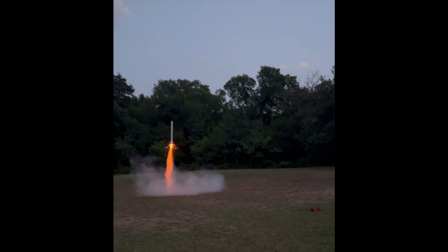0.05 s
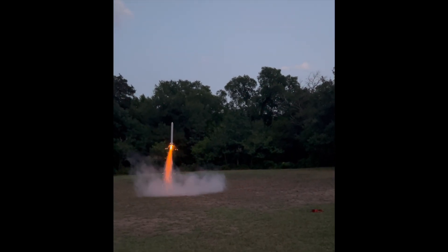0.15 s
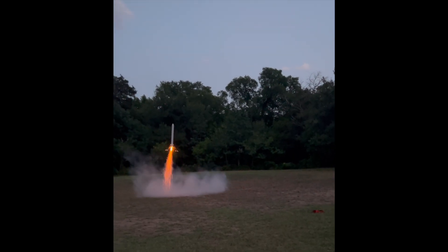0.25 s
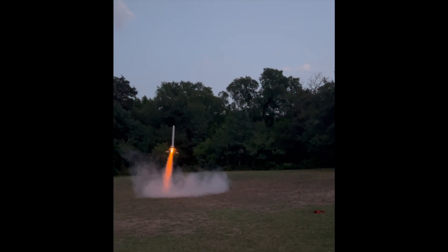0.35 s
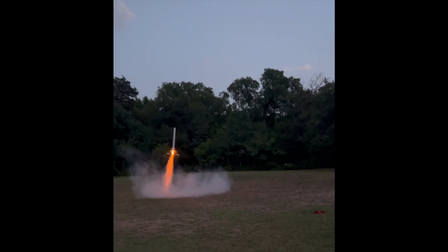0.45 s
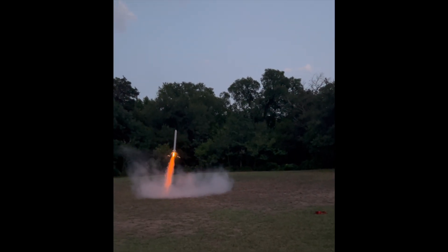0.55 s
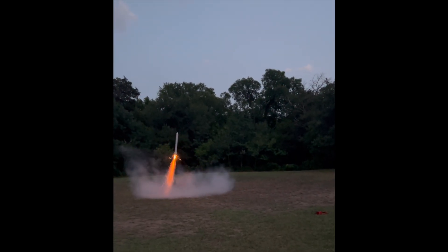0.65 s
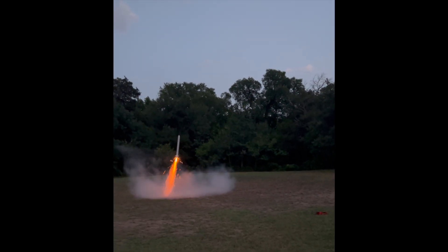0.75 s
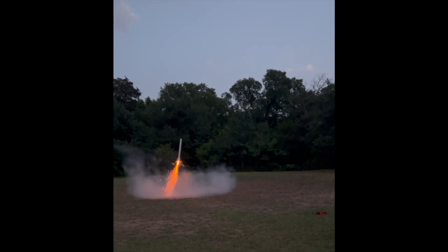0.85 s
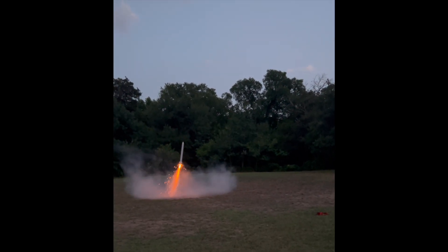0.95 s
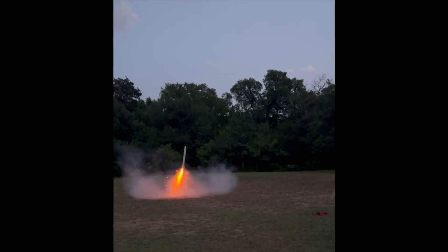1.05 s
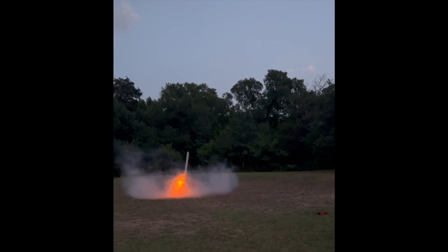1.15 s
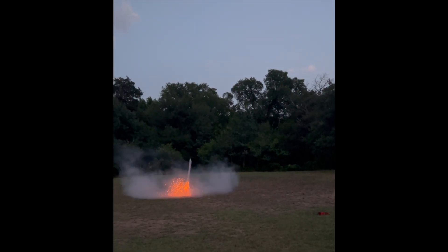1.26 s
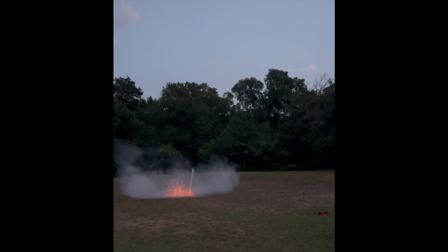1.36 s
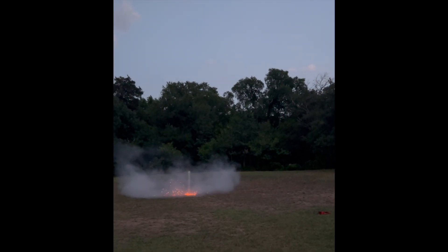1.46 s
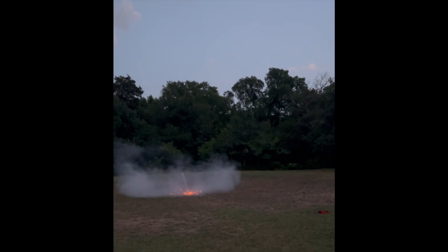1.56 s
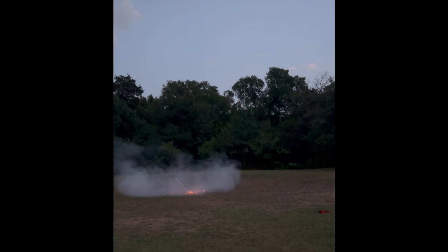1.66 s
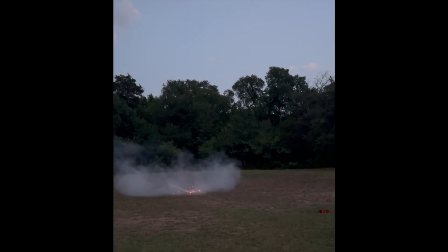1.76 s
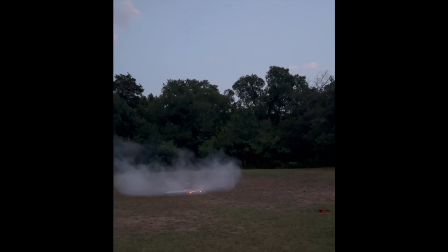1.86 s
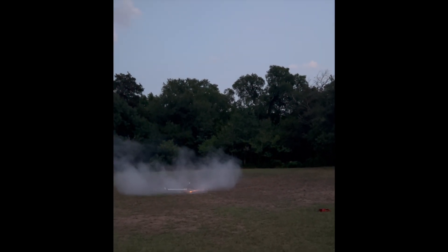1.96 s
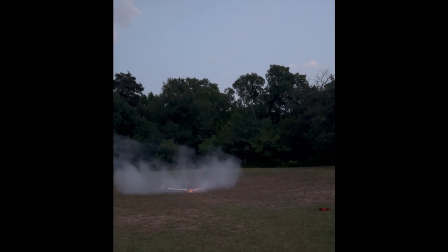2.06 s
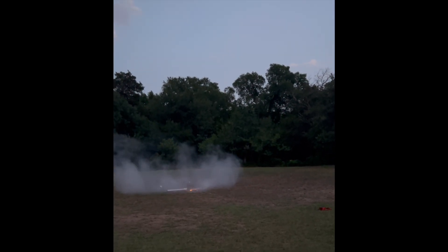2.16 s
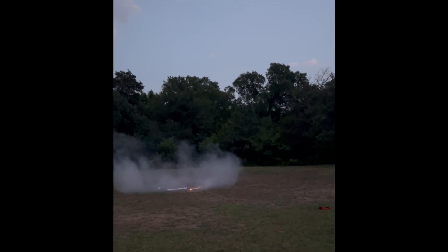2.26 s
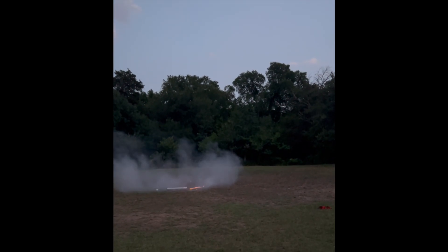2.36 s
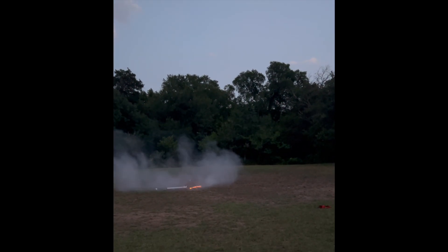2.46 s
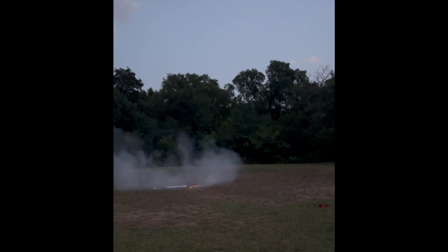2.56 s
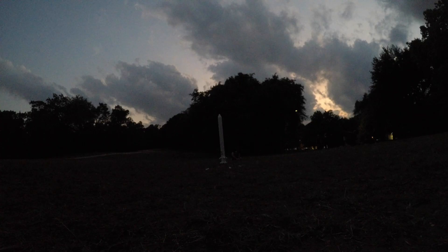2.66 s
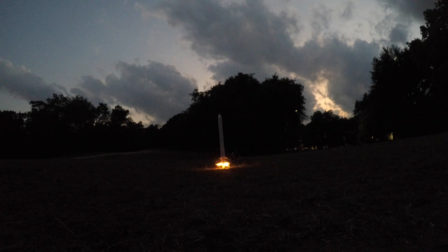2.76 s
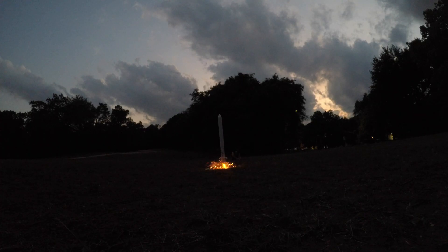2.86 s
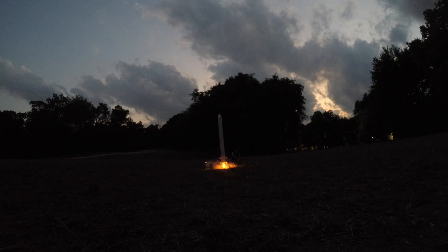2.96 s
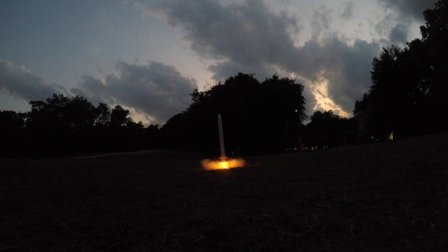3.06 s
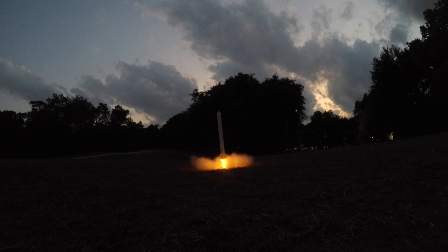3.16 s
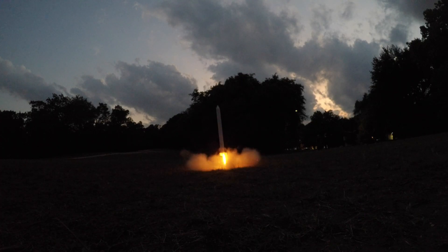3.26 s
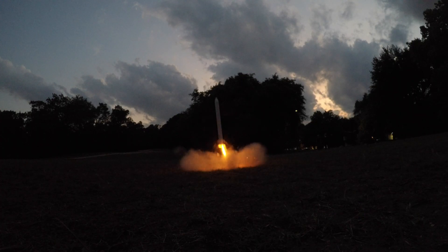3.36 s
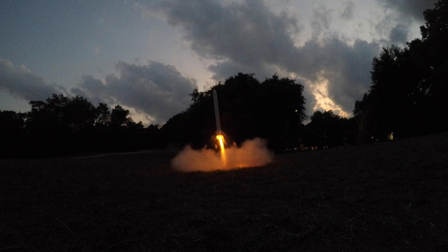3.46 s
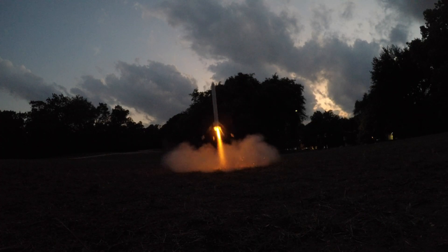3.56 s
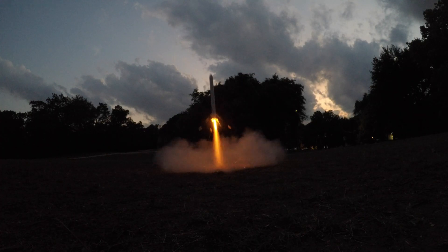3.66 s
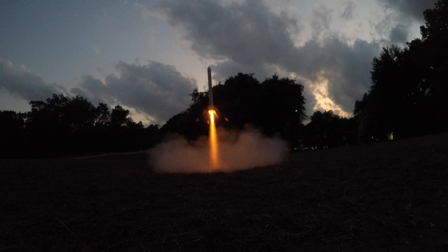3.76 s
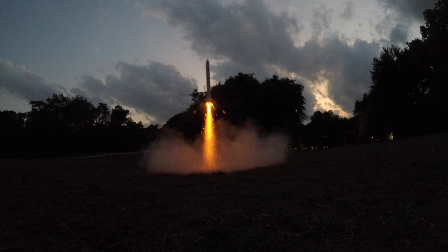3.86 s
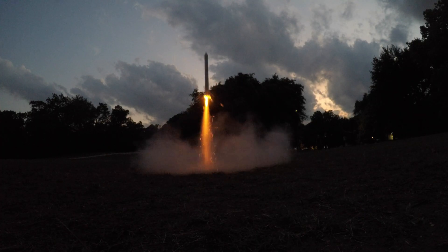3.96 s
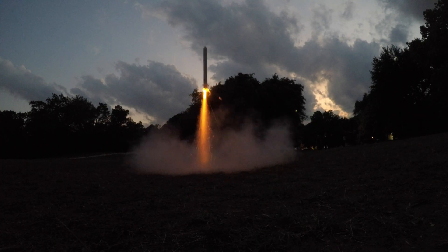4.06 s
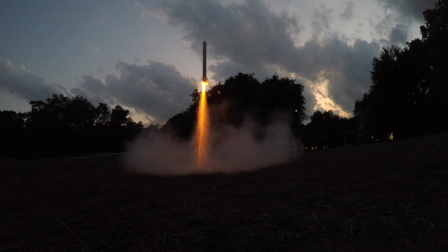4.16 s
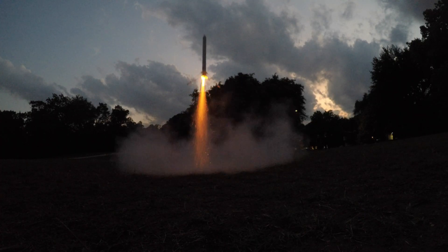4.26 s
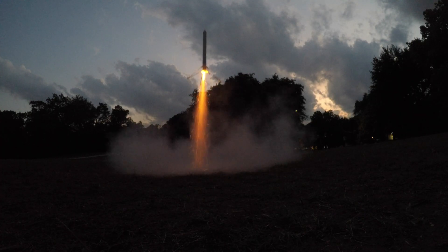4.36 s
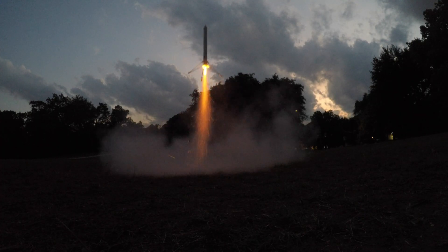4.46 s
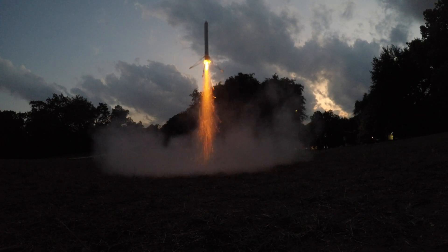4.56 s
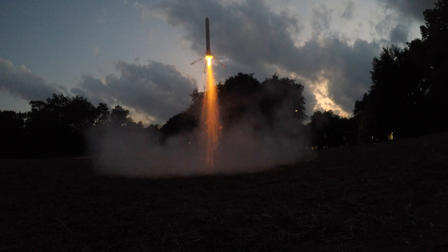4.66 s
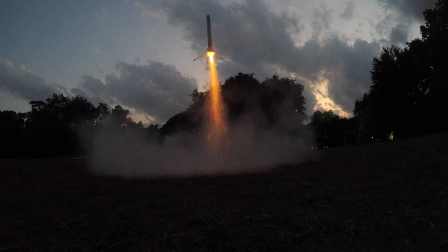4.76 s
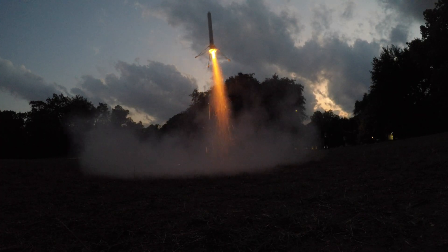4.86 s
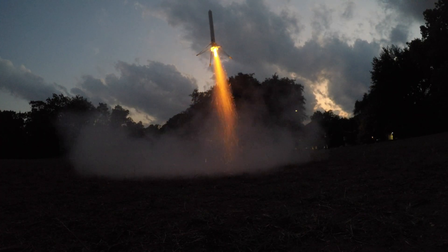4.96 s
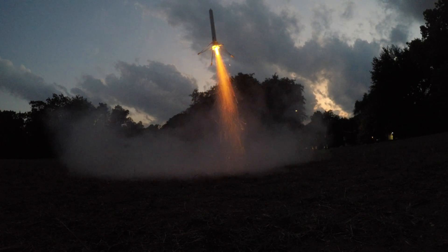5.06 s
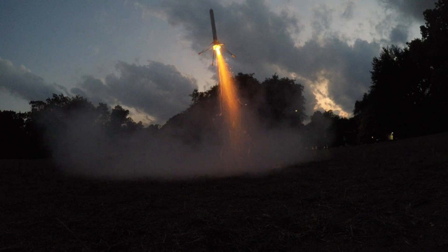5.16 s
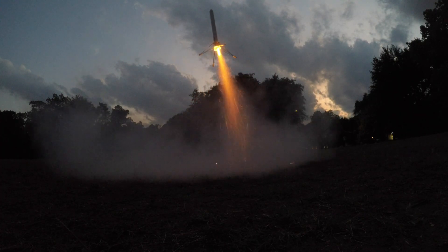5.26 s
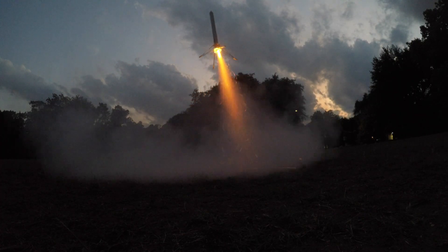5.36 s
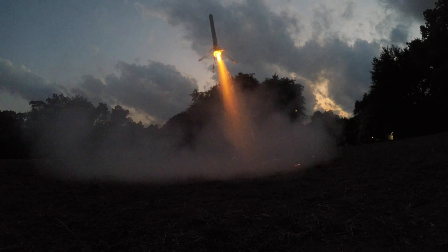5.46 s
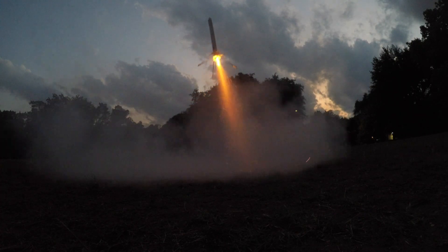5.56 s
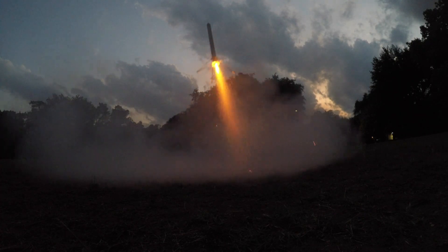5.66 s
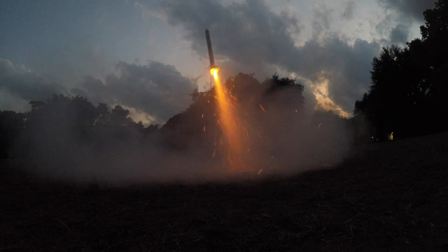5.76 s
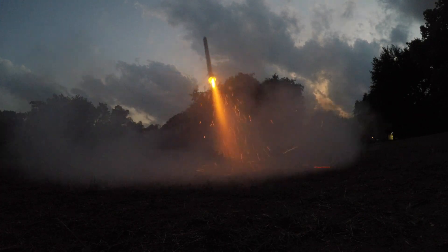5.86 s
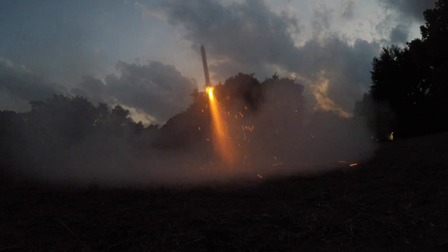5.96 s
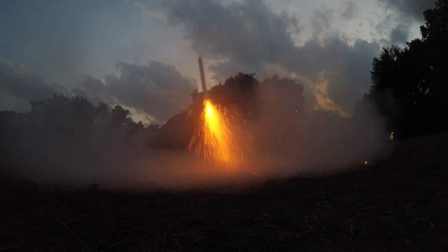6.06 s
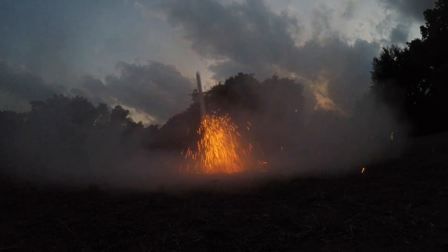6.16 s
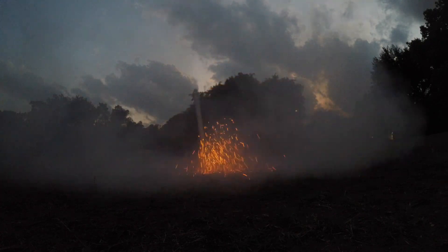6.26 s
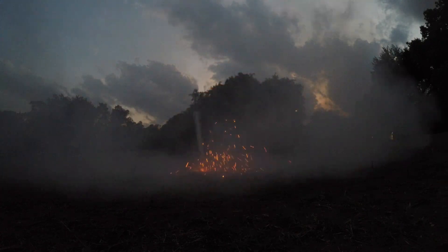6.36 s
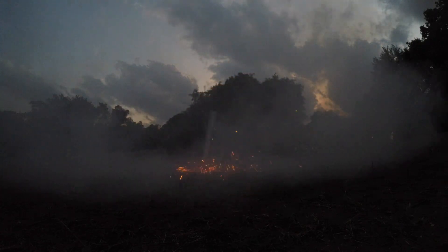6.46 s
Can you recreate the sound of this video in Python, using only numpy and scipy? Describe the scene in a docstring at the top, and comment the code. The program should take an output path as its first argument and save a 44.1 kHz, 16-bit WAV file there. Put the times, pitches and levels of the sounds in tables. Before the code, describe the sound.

A model rocket motor is already burning across an open field, an even rushing hiss with scattered pops and a slight sweep in tone. It dies at about 1.1 seconds. Light knocks at 1.3 mark the landing, followed by dry clicks, a grass scuff and low thuds. Faint smouldering, thin insect hiss and wind on the microphone fill the lull.

At 2.7 seconds the sound jumps close: a second motor ignites with a sharp crack and low boom, swelling by 3 seconds into a much louder, deeper roar. The hiss flares around 3.4 as it lifts off. Irregular sharp pops pepper the jet, which grows brighter and less deep, its tone sweeping slowly as the rocket climbs and sinks. Near 6 seconds the rush collapses into short, rough hoots and chuffs, with one more crack at 6.3 and a low rumble until about 6.5.

```python
"""Two rocket hops over a grass field.

The first is heard from far off, then a cut takes us close to the second; each has its own two-port
microphone. A jet is roar, rush and hiss with pressure pops. It arrives twice, straight and off the
grass, so notches slide as the rocket climbs and sinks. Between the burns: a landing, wind on the
ports, insects and evening air."""
import sys
import numpy as np
from scipy import signal
from scipy.fft import rfft, irfft, next_fast_len
from scipy.io import wavfile
from scipy.ndimage import uniform_filter1d, map_coordinates

SR = 44100
rng = np.random.default_rng(int(sys.argv[2]) if len(sys.argv) > 2 else 0)


def store_wav(level_fs):
    """Save 16-bit WAV to argv[1]."""
    pcm = np.round(np.clip(np.atleast_2d(level_fs), -1, 1) * 32767)
    wavfile.write(sys.argv[1], SR, pcm.T.astype(np.int16))


N = 286650

# The far jet burns evenly, then dies, the hiss first. One row each for roar, rush and hiss.
# Each row: level in dB, burnout in seconds, t60 in seconds.
FAR_BURN = [(-43.5, 1.12, 0.13), (-31, 1.078, 0.25), (-25.5, 1.024, 0.47)]
# Their spectra at the right port, a list a layer. Each row: frequency in Hz, relative level in dB.
FAR_SPECTRA = ([(20, -29), (70, -3.5), (150, -5.5), (350, -7), (700, -17), (1500, -120)], [(150, -59),
               (350, -3.5), (800, 3), (1500, 2), (2800, 1), (3600, -4.5), (6000, -120)], [(1500, -120),
               (2600, -4), (3500, -3), (7500, -3), (8300, -6.5), (10500, -5), (12000, -1.5), (13500, -11),
               (16000, 0)])
# What the grass returns to each microphone. Each row: frequency in Hz, gain in dB.
FAR_ECHO = [(300, -4), (1300, -4.5), (2500, -5.5), (4000, -8), (6000, -11), (9000, -20)]
NEAR_ECHO = [(500, -6), (1200, -8), (2300, -6.5), (3800, -.4), (5300, -5), (7500, -6), (9500, -16)]
# Left port against right. Each row: frequency in Hz, gain in dB, lead in radians, likeness from 0 to 1.
FAR_PORTS = [(50, -1.5, 0, .9), (250, -3.5, .2, .92), (520, -8, .65, .96), (1200, -2.5, .6, .96),
             (2000, 0, 0, 1), (4200, 0, 0, 1), (4700, 3, -.8, .6), (5200, -1, -4, .55),
             (5800, 0, -2 * np.pi, 1), (8100, 0, -2 * np.pi, 1), (9000, 0, -7.4, .7), (11500, 0, -8.4, .76),
             (13000, 0, -3 * np.pi, 1), (16000, 0, -3 * np.pi, 1)]
NEAR_PORTS = [(50, 0, 0, 1), (150, -.7, -.14, 1), (300, -2.8, -.38, 1), (550, -11, -.9, .97),
              (700, -22, -2, .6), (950, -8.5, -3.8, .95), (1700, -3, -4.8, .88), (2250, 4.5, -5.8, .78),
              (2750, -1, -6.8, .8), (3500, -.3, -6.28, 1), (4800, 0, -6.3, .98), (5300, -2.5, -5.9, .83),
              (6500, 6, -5.5, .86), (7900, 5, -5.5, .65), (9000, 0, -7.8, .4), (10800, -9, -5.6, .25),
              (12800, 1, -6.2, .85), (15000, 0, -6.25, .92)]
# Pressure pops in the flame. Each row: time in seconds, level in dB.
FAR_POPS = [(.044, -10), (.0565, -10.5), (0.164, -19), (0.4666, -18), (0.5532, -8.5), (0.774, -9),
            (.7971, -9), (0.861, -11)]
NEAR_POPS = [(3.297, -23), (3.8177, -2.5), (3.8553, -6), (4.002, -9), (4.1226, -7), (4.327, -13),
             (4.51, -9), (4.5476, -16), (4.9386, -2), (4.9508, -9), (5.1329, -15), (5.3096, -12),
             (5.368, -7.5), (5.4427, -5.5), (5.631, -12), (5.6463, -10), (5.6629, -2.5), (5.7242, -11),
             (5.7491, -4), (5.771, -17), (5.8135, -11), (5.8492, -8), (5.9317, -11), (5.9796, -8.5)]
# The field between burns. Each row: time in seconds, then rumble, smoulder, air and wind in dB.
FIELD_LEVELS = [(1.05, -67, -78, -76, -64), (1.12, -48, -48, -53, -63), (1.3, -55, -53.5, -49.5, -43),
                (1.45, -44, -43.5, -51, -58), (1.55, -49, -55.5, -58, -42), (1.78, -43.5, -56.5, -60, -45),
                (1.92, -42.5, -49.5, -57, -38), (2.2, -47, -47.5, -57, -44), (2.42, -49, -47.5, -57, -54),
                (2.7, -43, -48.5, -58.5, -60)]
# The spectra of those four. Each row: frequency in Hz, relative level in dB.
RUMBLE_SPECTRUM = [(20, -26), (50, 2), (90, 0.5), (180, -11.5), (300, -32), (600, -120)]
SMOULDER_SPECTRUM = [(150, -2), (350, -11), (650, -6), (1100, -11.5), (1600, -14), (1900, -34),
                     (3000, -120)]
AIR_SPECTRUM = [(1000, -60), (1900, -4), (3000, -2.5), (4290, -5.5), (4420, 3.5), (4560, -8), (7500, -10.5),
                (8500, -20), (10500, -16), (12500, -16), (14800, -1), (16000, 7)]
WIND_SPECTRUM = [(20, -30), (70, 0), (130, 0), (230, -10), (400, -20), (650, -19), (1000, -30),
                 (2000, -120)]
# Low thuds after the first burn. Each row: centre in seconds, level in dB, length in ms.
THUDS = [(1.225, -37, 50), (1.305, -30.5, 40), (1.49, -33, 44), (1.535, -32, 74), (1.616, -36, 56),
         (1.82, -46, 80), (1.89, -51, 40), (1.95, -44, 42), (2.66, -52, 30)]
# Dry cracks. Each row: start in seconds, level in dB, t60 in ms.
FAR_CRACKS = [(1.287, -17.5, 18), (1.4392, -10.5, 18), (1.482, -18.5, 12), (1.9076, -27, 22),
              (2.161, -21.5, 12)]
NEAR_CRACKS = [(2.7282, -1.5, 19), (6.3315, -13.5, 18)]
# The legs knock the ground. Each row: time in seconds, level in dB, width in ms.
TOUCHDOWN = [(1.292, -26.5, 1.4), (1.303, -32, 1.1)]
# The spent rocket scuffs the grass. Each row: centre in seconds, level in dB, length in ms.
SCUFFS = [(1.44, -47.5, 48), (1.485, -56, 120)]
# Pressure heaves before the near jet sets in. Each row: time in seconds, level in dB, width in ms.
IGNITION_HEAVES = [(2.6945, -13, 3), (2.704, -29, 1.6), (2.712, -28, 1), (2.72, -25, 3.5),
                   (2.7306, -0.5, 0.42)]
# The jet from close by. Each row: time in seconds, roar of the blast in dB, rush of the flame in dB.
NEAR_JET_LEVELS = [(2.74, -39.5, -58.5), (2.8, -33.5, -48), (2.885, -20.5, -35.5), (2.96, -17, -29.5),
                   (3.22, -16.5, -27), (3.45, -21, -28), (3.6, -21, -28), (3.9, -22.5, -28),
                   (4.05, -21, -25.5), (4.35, -24.5, -26), (4.6, -29, -26.5), (5.3, -29, -26.5),
                   (5.92, -26.5, -27.5), (5.98, -26, -40.5), (6.09, -46.5, -52.5), (6.3, -37, -52.5),
                   (6.36, -31, -63), (6.43, -45, -66), (6.5, -43, -69)]
# Its boom, roar, rush, hiss and sizzle, a list a layer. Each row: frequency in Hz, relative level in dB.
NEAR_SPECTRA = ([(12, -20), (30, -19), (90, -2.5), (140, -9.5), (220, -8.5), (500, -120)], [(60, -40),
                (130, -3), (220, -1.5), (400, 0), (600, 3.5), (900, -8.5), (1500, -21), (3000, -120)],
                [(400, -38), (900, -8), (1600, 0), (2300, -5), (3400, -1.5), (4400, -6), (5500, -54),
                (9000, -120)], [(2500, -120), (4000, -13), (4700, -6), (6200, -3), (7500, -4.5),
                (8300, -15.5), (9000, -29), (11000, -120)], [(6000, -120), (8000, -7.5), (9500, 4.5),
                (10500, -0.5), (11300, -6), (12500, -4), (15300, -8.5)])
# The lag by way of the grass, growing with height. Each row: time in seconds, delay in ms.
NEAR_ECHO_DELAY = [(2.7, .06), (3.2, .13), (3.6, .295), (3.85, .395), (4.15, .51), (4.45, .59),
                   (4.85, .662), (5.15, .687), (5.42, .657), (5.75, .567), (5.95, .48), (6.2, .2)]
# The hiss flares as the rocket leaves the pad. Each row: centre in seconds, level in dB, length in ms.
LIFTOFF_FLARE = [(3.42, -29, 280)]
# The motor tube hoots. Each row: centre in seconds, level in dB, pitch in Hz, length in ms.
CHUFFS = [(5.972, -14, 463, 8.8), (5.984, -15, 510, 14), (6.001, -14, 505, 14.6), (6.015, -18, 510, 11),
          (6.046, -21.5, 434, 30), (6.178, -20, 560, 12.3), (6.263, -31, 490, 12), (6.312, -18.5, 663, 14),
          (6.335, -15, 410, 12.6), (6.349, -25, 250, 6.5), (6.374, -17, 208, 12.3), (6.384, -19.5, 355, 15),
          (6.394, -25, 637, 14)]

CUT_S = 2.684  # from the far microphone to the near one
TOP_HZ, NEAR_TOP_HZ = 15850, 15300
FAR_DELAY_MS, FAR_SINK_MS_PER_S2 = 1.22, .41  # the grass echo closes in as the rocket sinks
FAR_CLEAR_MS, NEAR_CLEAR_MS, BLUR_DB_PER_MS = .8, .57, 27  # lower down, smoke and dust weaken the echo
TREES_DB, TREES_T60_S = -17.5, 1.0
BOOM_DB, HISS_DB, SIZZLE_DB = -13, -2.5, -12  # boom against the roar, hiss and sizzle against the rush
HISS_DB_PER_MS, SIZZLE_DB_PER_MS = 10, 7.5  # brighter as the rocket climbs clear of its smoke
IGNITION_DB, IGNITION_T60_S, LINGER_DB = -18.5, 2.94, -43.5  # the boom fades to a lingering rumble
SURGE_BOOM_DB, SURGE_ROAR_DB, SURGE_MS = -19, -21, 18  # swells round each listed pop and hoot


def amp(db):
    return 10 ** (np.asarray(db) / 20)


def along(points, hz):
    """Each column after the first, read on a log frequency axis."""
    knots_hz, *columns = np.transpose(points)
    return [np.interp(np.log(hz + 1), np.log(knots_hz + 1), column) for column in columns]


def curve(rows):
    """One value per sample for each column after the time."""
    times, *columns = np.transpose(rows)
    return [np.interp(np.arange(N) / SR, times, column) for column in columns]


def wobble(rate):
    """A smooth random curve, rate knots a second."""
    return map_coordinates(rng.standard_normal(int(N * rate / SR) + 4), [np.arange(N) * rate / SR])


def filtered(x, response):
    """x times a complex response of frequency."""
    size = next_fast_len(N + 8192)
    return irfft(rfft(x, size) * response(np.fft.rfftfreq(size, 1 / SR)), size)[..., :N]


def unit(pair):
    """Scales a pair so that the mean of its channels has rms 1."""
    return pair / pair.mean(axis=0).std()


def place(events):
    """Lays (start in seconds, wave) events on the first track of a silent pair."""
    track = np.zeros(N + SR)
    for s, wave in events:
        track[round(s * SR):][:len(wave)] += wave
    return np.array([track[:N], np.zeros(N)])


def swells(rows):
    """A gain that swells and fades. Each row: centre in seconds, level in dB, length in ms."""
    return place((s - ms / 2000, amp(db) * np.hanning(round(ms * SR / 1000))) for s, db, ms in rows)[0]


def fading(start_s, t60):
    """1 up to the start, then dying away."""
    return amp(-60 * np.maximum(np.arange(N) / SR - start_s, 0) / t60)


def turbulence(spectrum, patchy_db):
    """Two unrelated noises of one spectrum that share patches of random gain."""
    bins = signal.stft(rng.standard_normal((2, N)), nperseg=512)[2]
    patches = uniform_filter1d(rng.standard_normal(bins.shape[1:]), size=10, axis=0)
    patches = uniform_filter1d(patches, size=6, axis=1)
    pair = signal.istft(bins * amp(patchy_db * patches / patches.std()), nperseg=512)[1][:, :N]
    return filtered(pair, lambda hz: amp(along(spectrum, hz)[0]))


def jet(gains, spectra, lumps_db, to_mic, patchy_db):
    """Eddies from large to small, each size in its own lumps; one flutter of the flame moves them all."""
    flutter_db = .5 * wobble(7.8) + .42 * wobble(40)
    flame = 0
    for gain, spectrum, lump_db in zip(gains, spectra, lumps_db):
        unrest = amp(flutter_db + lump_db * wobble(50))
        flame += gain * unit(unrest * to_mic(turbulence(spectrum, patchy_db)))
    return flame


def far_burn(db, burnout_s, t60):
    """The gain of an even flame, its quick death and the slower answer of the tree line."""
    return amp(db) * (fading(burnout_s, t60) + amp(TREES_DB) * fading(burnout_s, TREES_T60_S))


def grass_bounce(pair, delay_ms, clear_ms, echo):
    """Adds the later copy off the ground; the blades scatter its treble away."""
    late = np.arange(N) - SR / 1000 * delay_ms
    dull = filtered(pair, lambda hz: amp(np.minimum(along(echo, hz)[0], 0)))
    through_smoke = amp(-BLUR_DB_PER_MS * np.maximum(clear_ms - delay_ms, 0))
    return pair + through_smoke * [map_coordinates(x, [late]) for x in dull]


def mic_ports(pair, table):
    """The right port hears the first signal; the left, that one shaded and shifted, plus the second."""
    def response(hz):
        db, lead, alike = along(table, hz)
        alike = np.clip(alike, 0, 1)
        return amp(db) * np.exp(1j * lead) * [alike, np.sqrt(1 - alike ** 2)]
    return np.array([filtered(pair, response).sum(axis=0), pair[0]])


def pressure_pulses(rows):
    """Pops, knocks and heaves: a quick push peaking on the given time, then a slower, weaker pull."""
    def pulse(s, db, width_ms):
        age = np.arange(SR // 20) / (SR / 1000 * width_ms)
        wave = age * age * (3 - age) * np.exp(-age)
        return s - wave.argmax() / SR, amp(db) * wave / wave.max()
    return place(pulse(*row) for row in rows)


def low_rumble(gain):
    """An uneven rumble with low thuds, reaching both ports alike."""
    low = turbulence(RUMBLE_SPECTRUM, patchy_db=1)[0] * amp(2 * wobble(25))
    return (gain + swells(THUDS)) * low / low.std()


def port_wind(gain):
    """Gusts on the microphone push its two ports mostly in opposite sense."""
    opposed, common = turbulence(WIND_SPECTRUM, patchy_db=.5) * amp(1.2 * wobble(30.9) + 2.5 * wobble(8.07))
    wind = np.array([.15 * common - opposed, .15 * common + opposed])
    return gain * wind / wind.std()


def smoulder(gain):
    """The spent motor smoulders out in the field, a dull patchy noise."""
    return gain * unit(mic_ports(turbulence(SMOULDER_SPECTRUM, patchy_db=2.5), FAR_PORTS))


def evening_air(gain):
    """A thin hiss round the far microphone, with insects as a narrow band near 4.4 kHz."""
    return gain * unit(mic_ports(turbulence(AIR_SPECTRUM, patchy_db=2.5), FAR_PORTS))


def cracks(rows, corner_hz):
    """Bursts of noise that die at once, their treble rolled off."""
    ms = np.arange(SR // 20) * 1000 / SR
    bursts = place((s, amp(db - 9 - 60 * ms / t60) * rng.standard_normal(len(ms))) for s, db, t60 in rows)
    return filtered(bursts, lambda hz: 1 / (1 + 1j * hz / corner_hz) ** 2)


def far_hop():
    """From across the field: the first rocket sinks, burns out and lands, and the evening comes through."""
    delay_ms = np.maximum(FAR_DELAY_MS - FAR_SINK_MS_PER_S2 * (np.arange(N) / SR) ** 2, 0)
    to_mic = lambda x: mic_ports(grass_bounce(x, delay_ms, FAR_CLEAR_MS, FAR_ECHO), FAR_PORTS)
    gains = [far_burn(*row) + swells(SCUFFS) for row in FAR_BURN]
    flame = jet(gains, FAR_SPECTRA, lumps_db=(.8, 1, .6), to_mic=to_mic, patchy_db=1.7)
    pops = to_mic(pressure_pulses((s, db, .11) for s, db in FAR_POPS))
    landing = mic_ports(pressure_pulses(TOUCHDOWN) + cracks(FAR_CRACKS, corner_hz=6000), FAR_PORTS)
    rumble, embers, air, gusts = amp(curve(FIELD_LEVELS))
    field = low_rumble(rumble) + port_wind(gusts) + smoulder(embers) + evening_air(air)
    return flame + pops + landing + field


def near_burn(delay_ms):
    """Gains of boom, roar, rush, hiss and sizzle: pops swell the low end, height lifts the treble."""
    roar, rush = amp(curve(NEAR_JET_LEVELS))
    surge = swells((s, db, SURGE_MS) for s, db, *_ in NEAR_POPS + CHUFFS)
    ignition = amp(IGNITION_DB) * fading(CUT_S, IGNITION_T60_S)
    flare = swells(LIFTOFF_FLARE)
    boom = amp(LINGER_DB) + amp(BOOM_DB) * roar + ignition + amp(SURGE_BOOM_DB) * surge
    hiss = rush * amp(HISS_DB + HISS_DB_PER_MS * delay_ms) + flare
    sizzle = rush * amp(SIZZLE_DB + SIZZLE_DB_PER_MS * delay_ms) + amp(SIZZLE_DB) * flare
    return boom, roar + amp(SURGE_ROAR_DB) * surge, rush, hiss, sizzle


def sputter(count=16, from_s=3.0, to_s=5.93, mean_db=-19.5, range_db=8):
    """Small pops in the flame at random moments. Each row: time in seconds, level in dB."""
    when, size = rng.random((count, 2)).T
    return list(zip(from_s + (to_s - from_s) * when, mean_db + range_db * (size - .5)))


def chuffs():
    """As the flame gutters, the tube's air column hoots for a few rough cycles at a time."""
    def hoot(s, db, hz, length_ms):
        n = round(length_ms * SR / 1000)
        drift = 1 + .15 * np.cumsum(rng.standard_normal(SR // 20))[:n] / np.sqrt(n)
        tone = np.sin(2 * np.pi * np.cumsum(hz * drift) / SR)
        return s - length_ms / 2000, amp(db) * np.hanning(n) * tone
    return place(hoot(*row) for row in CHUFFS)


def near_hop():
    """Close to the pad: the second rocket lights, climbs, sinks and gutters out."""
    delay_ms, = curve(NEAR_ECHO_DELAY)
    to_mic = lambda x: mic_ports(grass_bounce(x, delay_ms, NEAR_CLEAR_MS, NEAR_ECHO), NEAR_PORTS)
    gains = near_burn(delay_ms)
    flame = jet(gains, NEAR_SPECTRA, lumps_db=(.5, .49, .77, .67, .98), to_mic=to_mic, patchy_db=.77)
    pops = to_mic(pressure_pulses((s, db, .24) for s, db in NEAR_POPS + sputter()))
    near_ground = pressure_pulses(IGNITION_HEAVES) + chuffs() + cracks(NEAR_CRACKS, corner_hz=3540)
    return flame + pops + mic_ports(near_ground, NEAR_PORTS)


def scene():
    """The far microphone, then a 5 ms crossfade to the near one."""
    fade = np.clip((np.arange(N) / SR - CUT_S) / .005, 0, 1)
    far = filtered((1 - fade) * far_hop(), lambda hz: hz < TOP_HZ)
    near = filtered(fade * near_hop(), lambda hz: hz < NEAR_TOP_HZ)
    return far + near


def record(dry):
    """The highest peaks are rounded off; nothing is kept above the band limit."""
    rounded = dry / (1 + np.abs(dry / .8) ** 4) ** (1 / 4)
    return filtered(rounded, lambda hz: hz < TOP_HZ)


dry = scene()
out = record(dry)
store_wav(out)
```